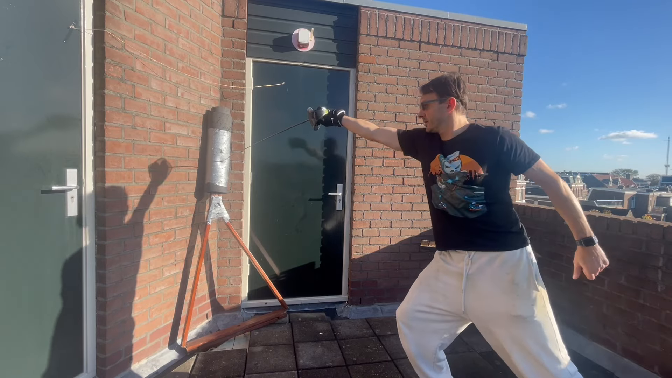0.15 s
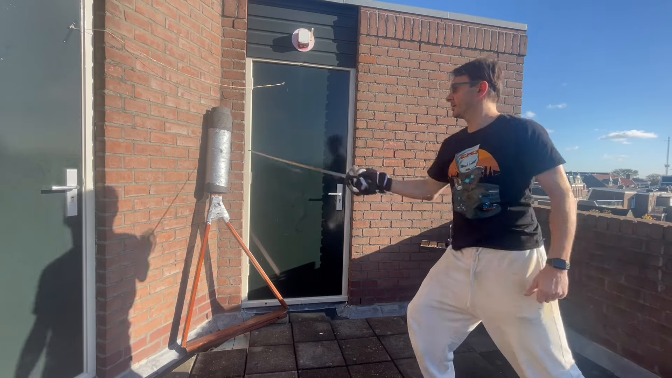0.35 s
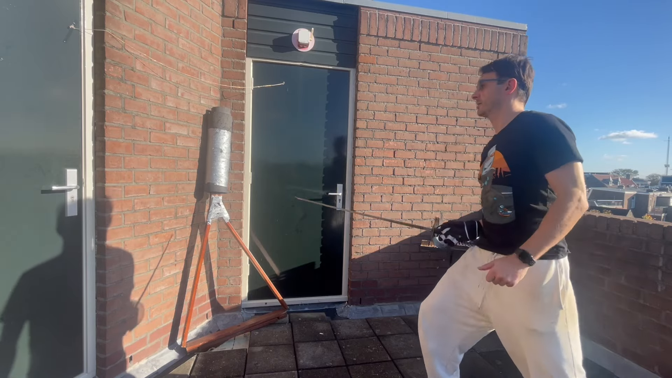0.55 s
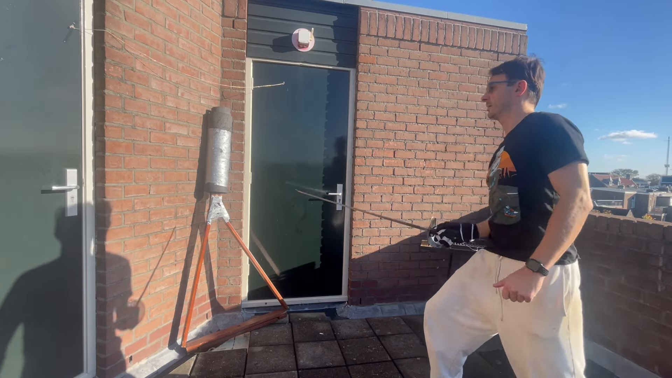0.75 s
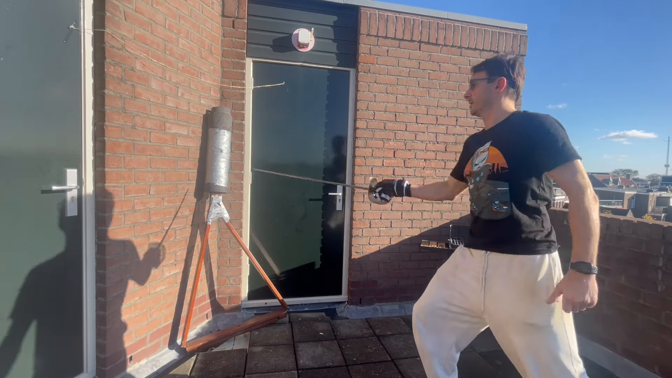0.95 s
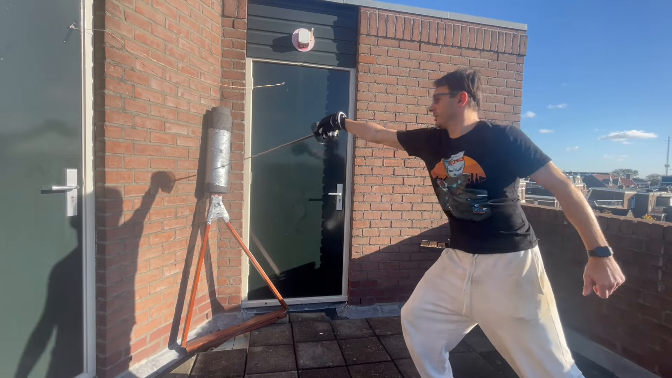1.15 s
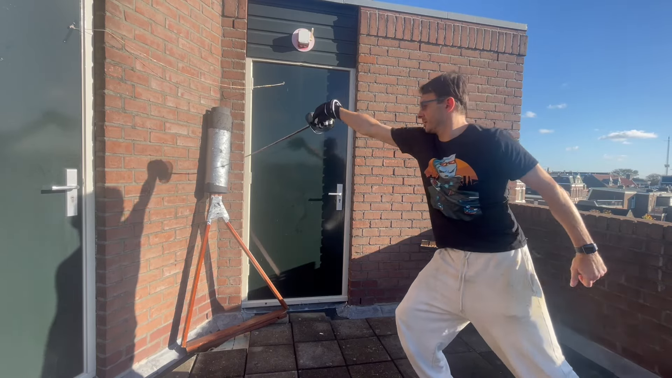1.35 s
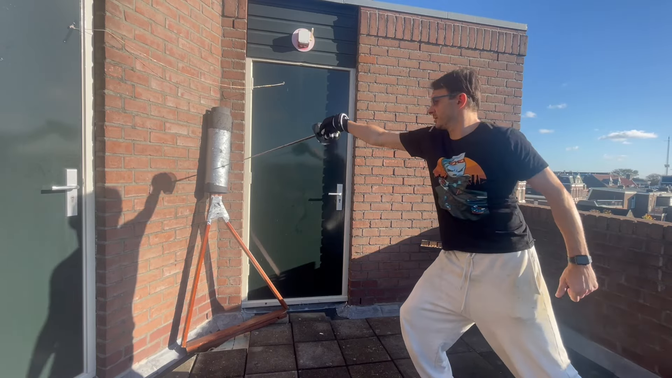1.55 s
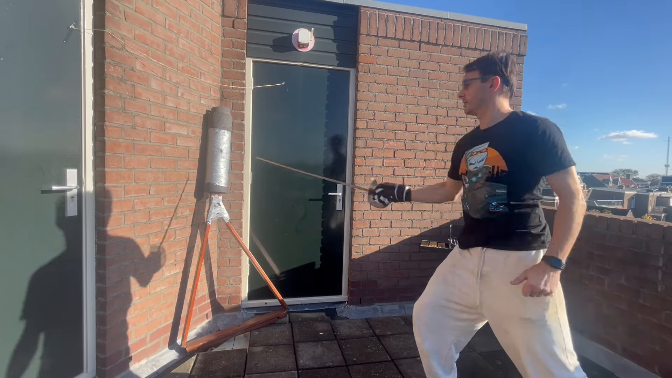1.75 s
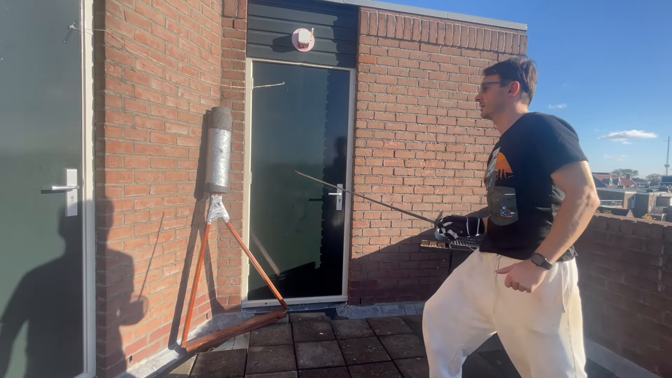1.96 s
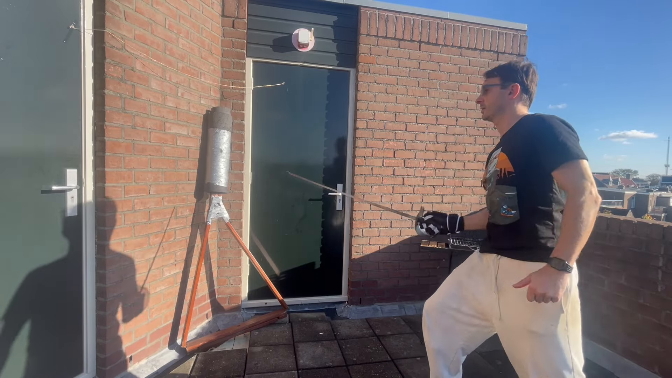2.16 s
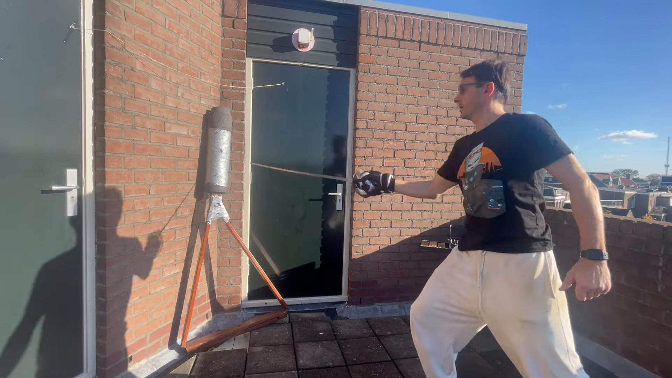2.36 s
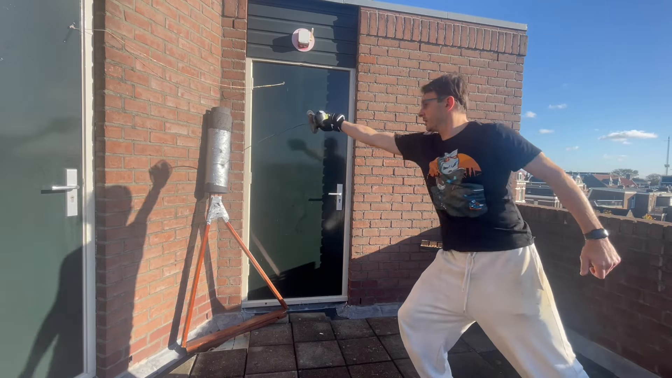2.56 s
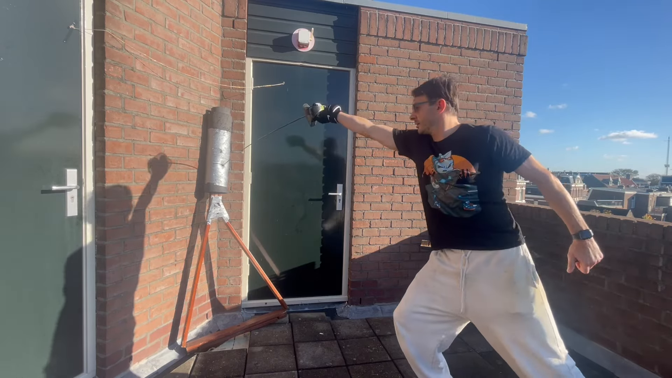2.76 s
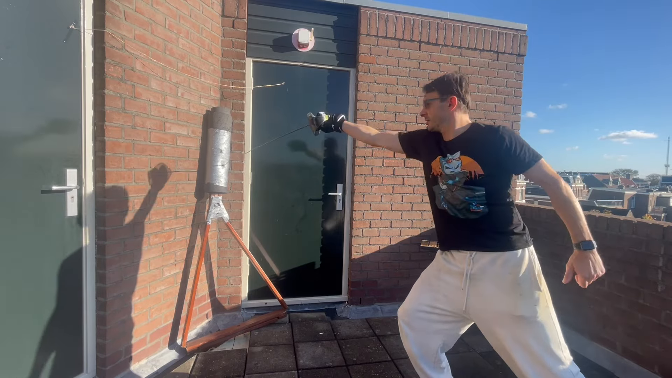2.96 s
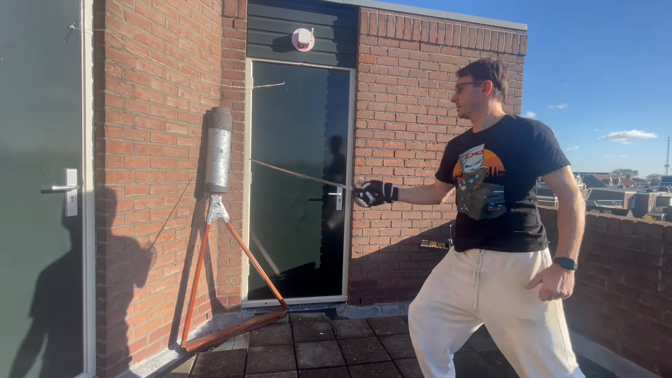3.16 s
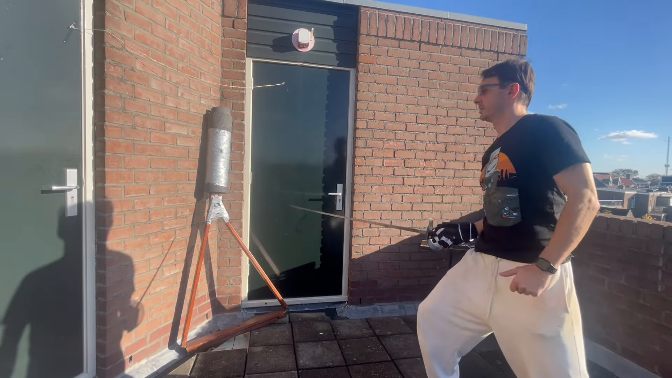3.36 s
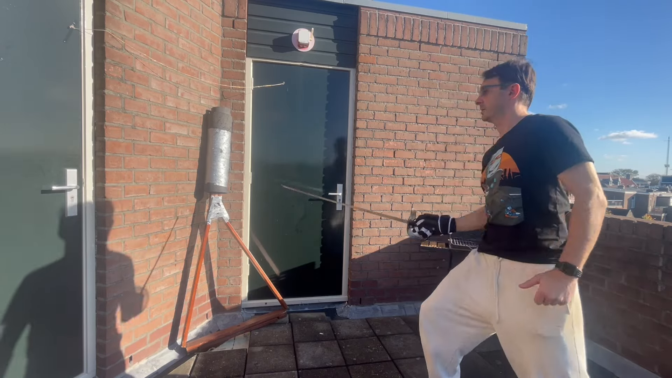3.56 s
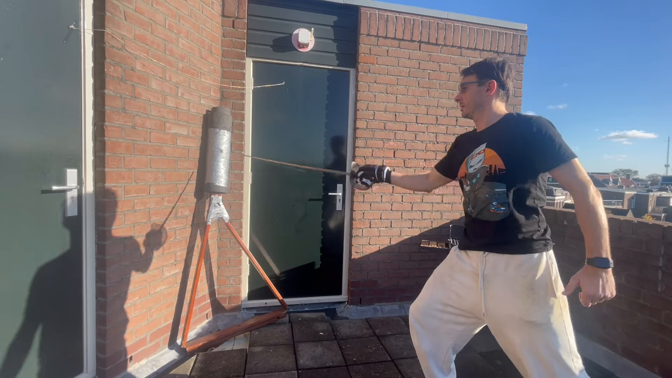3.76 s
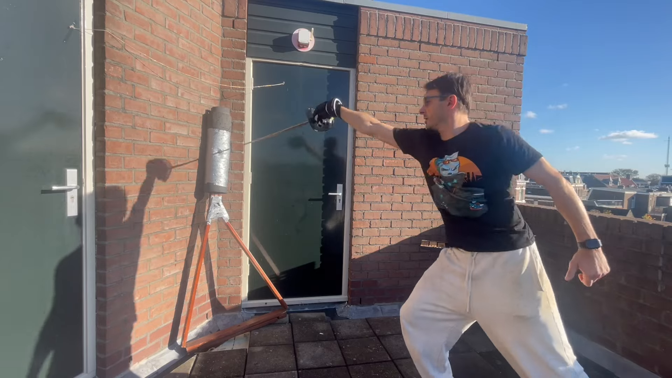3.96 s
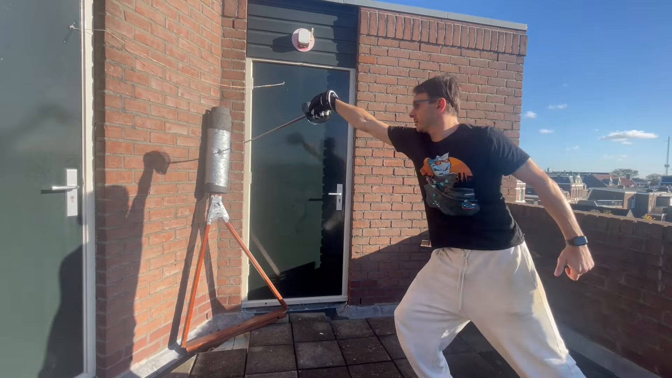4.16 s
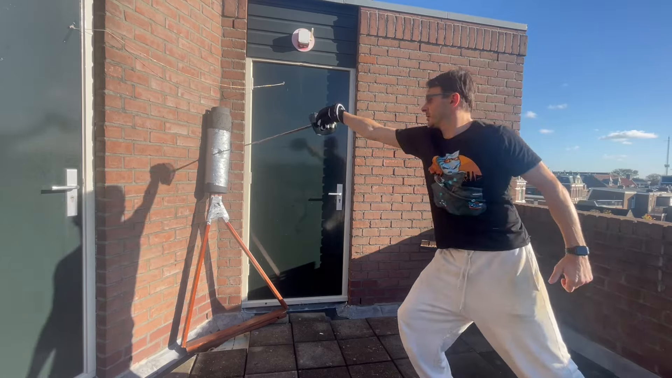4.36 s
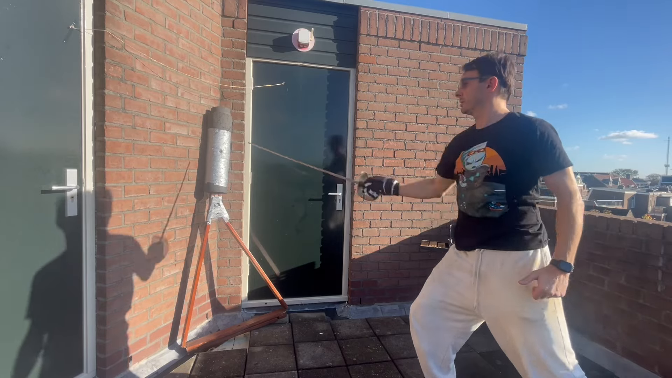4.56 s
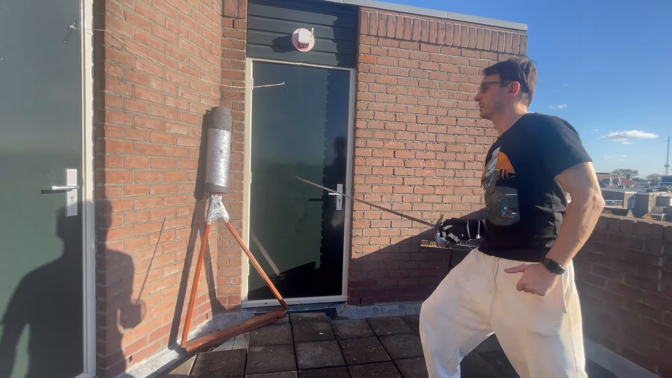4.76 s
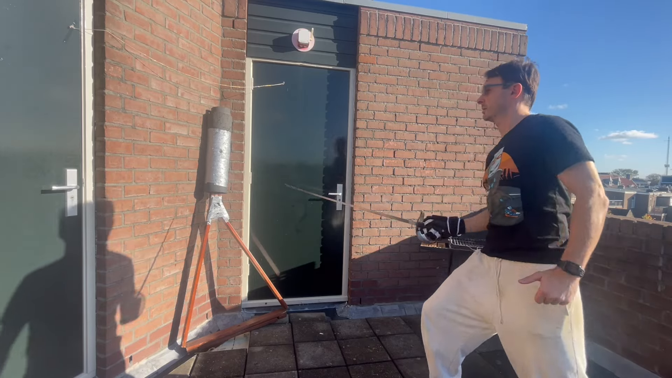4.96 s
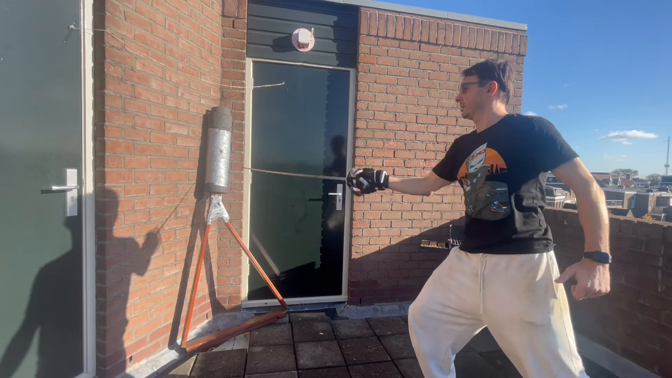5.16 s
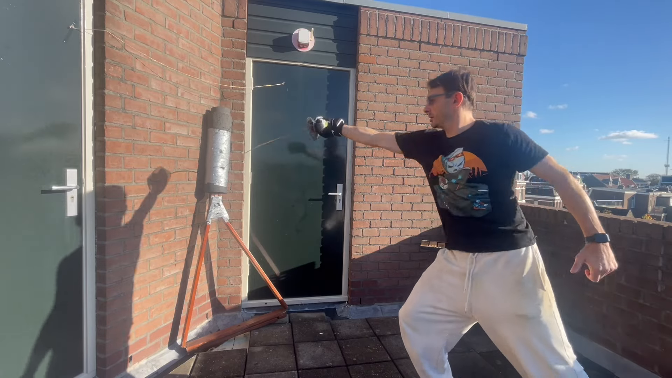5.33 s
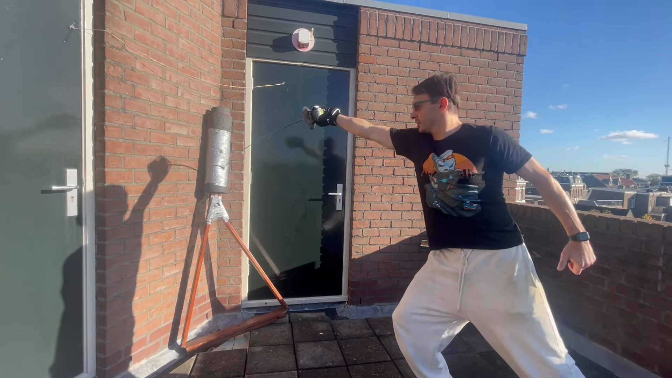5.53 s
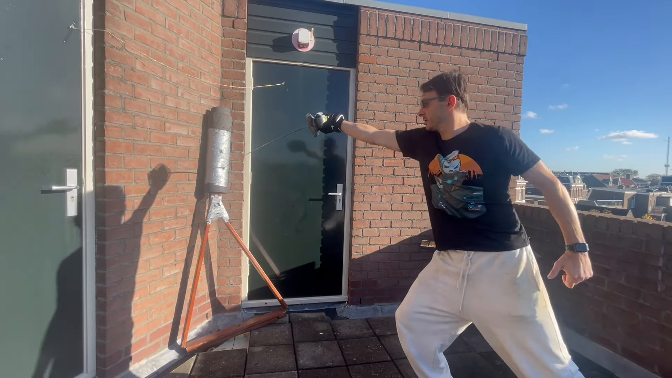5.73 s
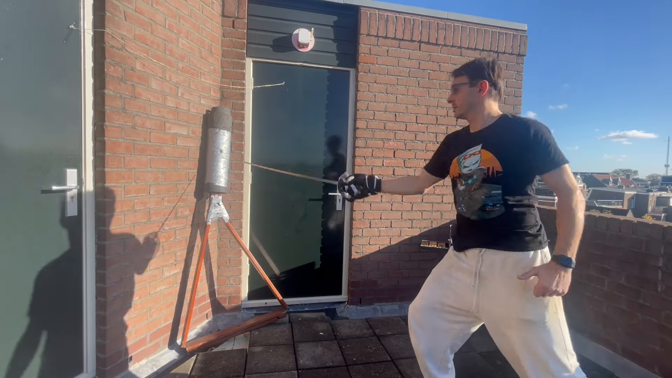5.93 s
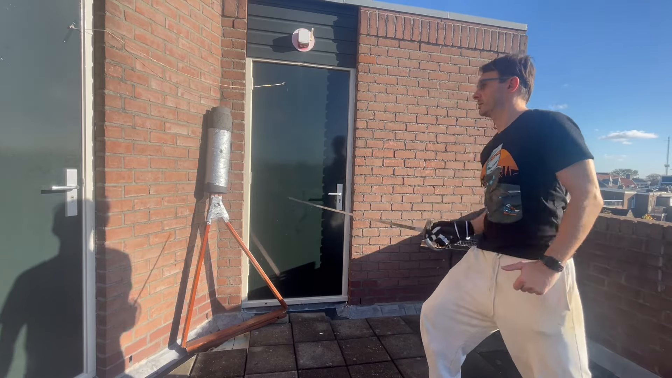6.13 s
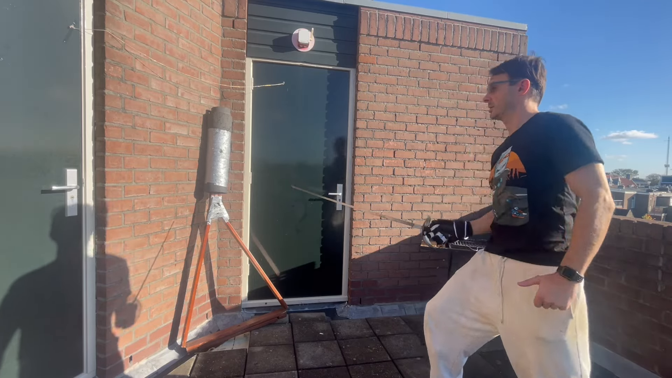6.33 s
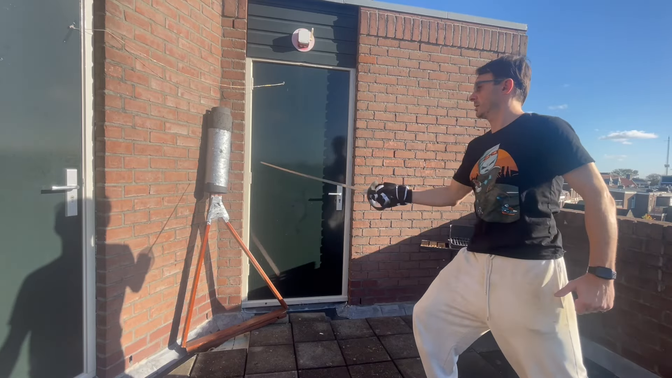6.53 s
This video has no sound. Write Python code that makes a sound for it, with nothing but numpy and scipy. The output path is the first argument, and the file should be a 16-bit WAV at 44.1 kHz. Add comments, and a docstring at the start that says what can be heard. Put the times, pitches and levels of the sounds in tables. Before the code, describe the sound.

Four sharp, hollow knocks of a blade tip on a padded pipe, spaced over a second apart, above low town rumble and soft cloth swishes.

```python
"""Town rumble and a thin high whine run throughout, with a vehicle fading away, under cloth swishes and gear ticks.
Place: the brick corner of a roof terrace, where a fencer thrusts four times at a padded pipe on a wooden stand.
Each tip lands, drags and bends for some 35 ms before the target knocks; the walls answer both at once.
Blows ring damped modes and spit noise through wall echoes; cloth and town are shaped noise, the whine two sines."""
import sys
import numpy as np
from scipy import signal
from scipy.fft import rfft, irfft, next_fast_len
from scipy.io import wavfile
from scipy.ndimage import map_coordinates

SR = 44100
rng = np.random.default_rng(int(sys.argv[2]) if len(sys.argv) > 2 else 0)


def file_out(sig):
    """Save sig as 16-bit WAV at sys.argv[1]."""
    # one column per channel
    cols = np.atleast_2d(sig).T
    # limit, then scale
    lim = np.clip(cols, -1, 1)
    pcm = np.round(lim * 32767).astype(np.int16)
    wavfile.write(sys.argv[1], SR, pcm)


N = 290619
TIME_S = np.arange(N) / SR
TAIL_S = np.arange(SR // 3) / SR  # time axis of every short sound
IMPULSE = (TAIL_S == 0) * 1.0


# The tip lands and drags: [t/s, ring level/dB, stand thud level/dB, crack level/dB,
# crack tilt/dB per octave, softness corner f/Hz, drag/s]
TIP_TOUCHES = [(1.12, -38, -35, -50, 0, 1200, 0.056), (2.484, -36.5, -30.5, -43, -2, 1110, 0.031),
               (3.892, -39, -61, -51, 0, 1499, 0.066), (3.902, -38.5, -22.5, -36.5, -7, 2150, 0.04),
               (5.280, -38, -35.5, -51.5, 1.5, 1200, 0.031), (5.302, -42, -39, -48, 2.5, 1200, 0.0073)]
# The target knocks, rebounds or springs back: [t/s, ring level/dB, stand thud level/dB, crack level/dB,
# crack tilt/dB per octave, softness corner f/Hz, pitch ratio]
TARGET_KNOCKS = [(1.150, -40, -33.5, -53, 1, 1200, 1.0), (1.158, -27, -35.5, -32.5, -2.5, 1570, 0.92),
                 (1.215, -37, -48, -49, -11, 1200, 0.73), (2.519, -23.5, -31.5, -23, 0, 2080, 1.025),
                 (3.9293, -19, -25.5, -25.5, -8, 2030, 1.046), (5.317, -43, -37, -55, 3, 1000, 1.08),
                 (5.323, -28, -32.5, -33.5, -14.5, 960, 0.96), (5.356, -34.5, -46, -51, -20, 1850, 1.02),
                 (5.804, -49, -51, -52.5, -2, 1475, 1)]


def thrusts():
    """The tip chatters over the padding while the blade bends; then the target takes sharp knocks."""
    out = np.zeros((2, N))
    for s, ring_db, thud_db, crack_db, tilt_db, soft_hz, drag_s in TIP_TOUCHES:
        # cubed noise is spiky
        chatter = rng.standard_normal(len(TAIL_S)) ** 3 * np.exp(-(TAIL_S / drag_s) ** 2)
        force = 0.69 * unit(IMPULSE) + unit(chatter)
        add(out, s, target(force, ring_db, thud_db, crack_db, tilt_db, soft_hz, pitch=0.96))
    for s, *blow in TARGET_KNOCKS:
        single_impulse = np.ones(1)
        add(out, s, target(single_impulse, *blow))
    return out


# Modes of the padded pipe: [f/Hz, relative level/dB, t60/s]
PIPE_MODES = [(526, -11.5, 0.054), (637, -6.5, 0.081), (738, -5, 0.086), (883, -8, 0.13),
              (950, -2.5, 0.048), (1021, 0, 0.027), (1205, -0.5, 0.033), (1360, 1.5, 0.061),
              (1482, -5, 0.086), (1703, -5.5, 0.023), (1800, -6.5, 0.075), (1920, -8, 0.12),
              (2110, -11, 0.13), (2340, -13, 0.08), (2908, -10.5, 0.06), (3617, -7.5, 0.064)]
# Modes of its wooden stand: [f/Hz, relative level/dB, t60/s]
STAND_MODES = [(151, -16.5, 0.2), (196.8, 3, 0.14), (219.3, -9.5, 0.16), (243, -4.5, 0.097),
               (330, -7.5, 0.053), (384, -5, 0.19), (461.3, -8.5, 0.092)]


def target(force, ring_db, thud_db, crack_db, tilt_db, soft_hz, pitch):
    """A force rings the pipe, shakes the stand and cracks at the point of contact."""
    heard = through(force, terrace(wet_db=-7, left_db=3.5))
    pipe = ring(PIPE_MODES, pitch, soft_hz, heard)
    stand = ring(STAND_MODES, pitch, soft_hz, heard) * amp([[-1.8], [1.8]])  # leans right
    heard_crack = through(force, terrace(wet_db=0, left_db=6))
    snap = through(crack(life_s=0.0045, tilt_db=tilt_db), heard_crack)
    return amp(ring_db) * pipe + amp(thud_db) * stand + amp(crack_db) * burst(snap)


def ring(modes, pitch, soft_hz, heard):
    """Damped modes heard through the terrace; a soft blow reaches the high ones less."""
    contact_s = 0.00036  # time constant of a blow building up in the modes
    hz, db, t60 = np.transpose(modes)[..., None]
    envelopes = amp(-60 * TAIL_S / t60) * (1 - np.exp(-TAIL_S / contact_s))
    waves = envelopes * np.sin(2 * np.pi * hz * pitch * TAIL_S)
    varied_db = db + rng.normal(0, 1, db.shape)
    sizes = amp(varied_db) / np.sqrt(1 + (hz / soft_hz) ** 4)
    total = 0
    for k, (size, wave) in enumerate(zip(sizes, waves)):
        sign = (-1) ** k  # neighbours swing opposite ways
        total = total + sign * size * unit(through(wave, heard))
    return burst(total)


# Colour of a hard contact: [f/Hz, level/dB per Hz]
CONTACT_COLOUR = [(300, -19), (900, 5.5), (1500, 10), (2300, 1.5), (3000, 3), (4500, 0.5), (6300, -2),
                  (8000, -4.5), (10500, -13), (13000, -6), (14300, -30), (16000, -48)]


def crack(life_s, tilt_db):
    """A spit of decaying noise from a hard contact, tilted in dB per octave."""
    spit = rng.standard_normal(len(TAIL_S)) * np.exp(-TAIL_S / life_s)

    def colour(hz):
        return amp(along(CONTACT_COLOUR, hz) + tilt_db * np.log2((hz + 300) / 6000))

    return filtered(spit, colour)


# Paths from the corner: [delay t/s, relative level/dB, lead at the left microphone t/s]
WALL_PATHS = [(.0003, -2.5, 0.00037), (.0022, 10.5, 0.00034), (.0037, -1, 0.00036), (.0056, 5.5, .0004),
              (.0074, 3, 0.0005), (0.0113, 0.5, 0.00045)]
# Decay of the diffuse tail: [f/Hz, t60/s]
TERRACE_DECAY = [(150, 0.26), (600, 0.2), (1500, 0.13), (4000, 0.15), (13000, 0.15)]


def terrace(wet_db, left_db):
    """Direct sound and wall echoes, plus a fresh short diffuse tail at wet_db relative to them."""
    def walls(hz):
        response = 0
        for delay, db, lead in WALL_PATHS:
            arrivals = np.array([[delay], [delay + lead]])  # left, right
            response = response + amp(db) * np.exp(-2j * np.pi * hz * arrivals)
        return response

    early = filtered(IMPULSE, walls) * amp([[left_db / 2], [-left_db / 2]])
    hz, t, noise = signal.stft(rng.standard_normal((2, len(TAIL_S))), SR, nperseg=256)
    decaying = noise * amp(-60 * t / along(TERRACE_DECAY, hz)[:, None])
    tail = signal.istft(decaying, SR, nperseg=256)[1][:, :len(TAIL_S)]
    build_up = (1 - np.exp(-TAIL_S / 0.0027)) ** 2
    return unit(early) + amp(wet_db) * unit(tail * build_up)


def fencer():
    """Gear, soles and cloth sound as the body moves in and out."""
    return gear_ticks() + footsteps() + clothes()


# Small ticks of hilt and glove: [t/s, level/dB before the direct and echo gains, brightness/dB per octave]
GEAR_TICKS = [(0.553, -58, -5), (0.559, -55.5, -4), (1.081, -57, 4), (1.254, -56.5, -1.5),
              (1.618, -53, -11.5), (2.209, -57.5, 15), (2.37, -56.5, 15.5), (2.378, -66, 10),
              (2.423, -62, 13), (3.413, -57.5, -5), (4.295, -71, 12), (4.413, -62, -1), (4.462, -65.5, 9),
              (5.496, -62, 5), (5.783, -51.5, 3.5), (5.844, -59.5, 0.5), (5.915, -58, -1)]


def gear_ticks():
    """Very short contact noise, straight to the microphones and by way of the walls."""
    direct_db, echo_db = -8.5, -1.5
    out = np.zeros((2, N))
    for s, db, tilt_db in GEAR_TICKS:
        click = crack(life_s=0.00041, tilt_db=tilt_db)
        echo = through(click, terrace(wet_db=8, left_db=17))
        tick = amp(direct_db) * burst(click) + amp(echo_db) * burst(echo)
        add(out, s, amp(db) * tick)
    return out


# Shoes shift on the tiles: [t/s, level/dB]
SHOE_SHIFTS = [(1.629, -46), (5.437, -42), (5.505, -39.5), (5.54, -43.5), (5.725, -39.5), (5.805, -40)]


def footsteps():
    """Each sole gives a low, quickly damped bump."""
    out = np.zeros((2, N))
    for s, db in SHOE_SHIFTS:
        push = np.sin(2 * np.pi * 115 * TAIL_S) * np.exp(-TAIL_S / 0.013)
        add(out, s, amp(db) * burst(through(push, terrace(wet_db=-18, left_db=-3))))
    return out


# Swishes on each retreat and each lunge, in turn: [t/s of fastest motion, level/dB, swell/s, settle/s]
CLOTH_SWISHES = [(0.49, -63, 0.26, 0.14), (1.10, -69.5, 0.17, 0.41), (1.81, -64, 0.11, 0.13),
                 (2.55, -64.5, 0.15, 0.14), (3.28, -64, .2, 0.12), (3.91, -66.5, .12, 0.13),
                 (4.65, -65, 0.18, 0.16), (5.34, -65, 0.11, 0.16), (6.05, -65.5, 0.12, 0.13)]
# Colour of the cloth noise: [f/Hz, level/dB per Hz]
CLOTH_COLOUR = [(900, 2), (1800, 11.5), (3500, 6.5), (5500, -4), (7000, -0.5), (10000, -14), (11500, -0.5),
                (13200, -3.5), (16000, -14)]


def clothes():
    """Cloth noise swells with the motion of the body and flutters with its folds."""
    motion = sum(amp(db) * swell(s, rise, fall) for s, db, rise, fall in CLOTH_SWISHES)
    flutter = amp(1.5 * wobble(45))
    return motion * flutter * air(lambda hz: amp(along(CLOTH_COLOUR, hz)))


def swell(s, rise, fall):
    """A hump that peaks at time s."""
    shape = 1.27  # 1 = pointed, 2 = rounded
    t = TIME_S - s
    return np.exp(-np.abs(t / np.where(t < 0, rise, fall)) ** shape)


# Colour of the town's low rumble: [f/Hz, level/dB per Hz]
RUMBLE_COLOUR = [(20, -13), (30, -11), (45, -0.5), (65, 5), (92, 2.5), (112, 0), (130, -4.5), (200, -7),
                 (254, -9), (325, -22), (390, -14.5), (450, -19), (600, -61)]
# Colour of traffic wash and road noise: [f/Hz, level/dB per Hz]
WASH_COLOUR = [(150, -10), (330, 1), (500, 3.5), (1000, 3.5), (1600, -4), (2200, -11.5), (3000, -24),
               (5000, -30.5), (8500, -28), (10000, -38), (13000, -52), (16000, -71)]
# Fan hums: [f/Hz, nominal width/Hz, level/dB before the left-right lean]
FAN_HUMS = [(102.7, 14, -59.5), (210, 16, -67), (358.5, 7.9, -70), (581.3, 7, -66.5), (791.7, 8, -72.5)]


def town():
    """Steady traffic rumble and wash, one far vehicle fading away, and fan hums, all as shaped noise."""
    rumble_db, wash_db = -49, -59  # steady traffic
    engine_db, road_db, recede_db_per_s = -49, -57, 4  # far vehicle: levels at 0 s, then its fade
    receding = amp(-recede_db_per_s * TIME_S)
    rumble = amp(rumble_db + 0.9 * wobble(6)) * air(lambda hz: amp(along(RUMBLE_COLOUR, hz)))
    engine = amp(engine_db) * receding * narrow(270.5, 63.6)
    road = np.hypot(amp(wash_db), amp(road_db) * receding)  # powers add
    wash = road * amp(0.6 * wobble(4.52)) * air(lambda hz: amp(along(WASH_COLOUR, hz)))
    hums = 0
    for hz, width, db in FAN_HUMS:
        left_db = along([(300, -1.5), (800, 0.5)], hz)  # low hums lean right, higher ones left
        hums = hums + amp(db + left_db * np.array([[1], [-1]])) * narrow(hz, width)
    return (rumble + engine) * amp([[-1.2], [1.2]]) + wash * amp([[0.6], [-0.6]]) + hums


# Two close tones that beat: [f/Hz, level/dB before the overall and left-right gains]
WHINE_TONES = [(7946, -86.5), (8037, -83.5)]


def whine():
    """Two close sines, barely wandering in level, make a thin whine leaning left."""
    tones = 0
    for hz, db in WHINE_TONES:
        sine = np.sqrt(2) * np.sin(2 * np.pi * hz * TIME_S)
        tones = tones + amp(db + 0.41 * wobble(3.96)) * sine
    return tones * amp(-1 + 6.5 * np.array([[1], [-1]]))


# How alike left and right are: [f/Hz, likeness from -1 to 1]
LIKENESS = [(60, 0.84), (130, 0.94), (290, .5), (640, -0.43), (1400, -0.052), (7000, -0.045), (12000, 0.57)]


def air(colour):
    """Diffuse stereo noise of rms 1, its left-right likeness set by frequency."""
    def mid_side(hz):
        turn = np.arccos(np.clip(along(LIKENESS, hz), -1, 1)) / 2
        return colour(hz) * np.array([np.cos(turn), np.sin(turn)])

    mid, side = filtered(rng.standard_normal((2, N)), mid_side)
    return unit(np.array([mid + side, mid - side]))


def narrow(centre_hz, width):
    """A fuzzy tone: noise in one steep resonance."""
    return air(lambda hz: 1 / (1 + ((hz - centre_hz) / (0.74 * width)) ** 2))


def amp(db):
    """Decibels to amplitude."""
    return 10 ** (np.asarray(db) / 20)


def unit(x):
    """Scale to rms 1."""
    return x / np.sqrt(np.mean(x ** 2) + 1e-20)


def burst(x):
    """Scale a short sound to the energy of 10 ms at full level."""
    return unit(x) * np.sqrt(0.01 * SR / x.shape[-1])


def along(points, hz):
    """Read (Hz, value) points on a log frequency axis."""
    f, v = np.transpose(points)
    return np.interp(np.log(hz + 1), np.log(f + 1), v)


def wobble(rate):
    """A smooth random curve, rate knots a second."""
    knots = rng.standard_normal(int(N * rate / SR) + 4)
    return map_coordinates(knots, [np.arange(N) * rate / SR])


def filtered(x, response):
    """Apply a complex response of frequency to x."""
    n = x.shape[-1]
    m = next_fast_len(n + SR // 4)
    return irfft(rfft(x, m) * response(np.fft.rfftfreq(m, 1 / SR)), m)[..., :n]


def through(x, response):
    """Convolve a short sound with a stereo response."""
    return signal.fftconvolve(np.atleast_2d(x), response, axes=1)[:, :len(TAIL_S)]


def add(track, s, sound):
    """Mix a sound into the track at time s."""
    part = track[:, max(0, round(s * SR)):][:, :sound.shape[-1]]
    part += sound[:, :part.shape[1]]


def scene():
    """Thrusts at the target, then the fencer's body, the town and the whine, summed."""
    return thrusts() + fencer() + town() + whine()


def record(dry):
    """Keep only the sound below 15.8 kHz."""
    return filtered(dry, lambda hz: hz < 15800)


dry = scene()
out = record(dry)
file_out(out)
```